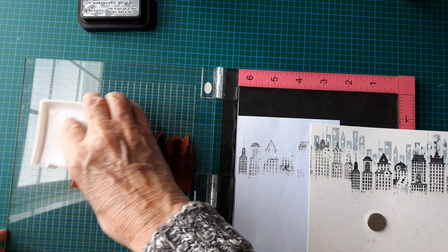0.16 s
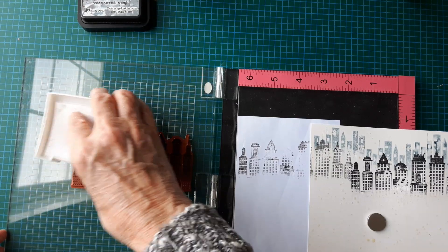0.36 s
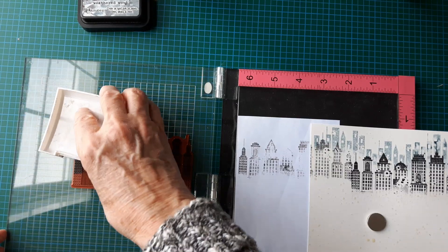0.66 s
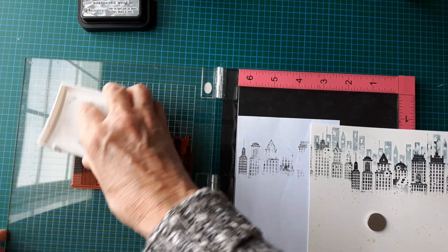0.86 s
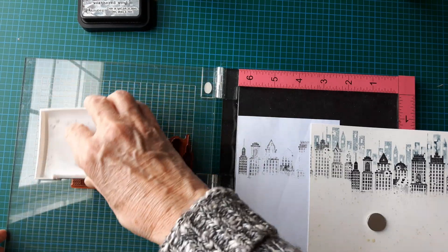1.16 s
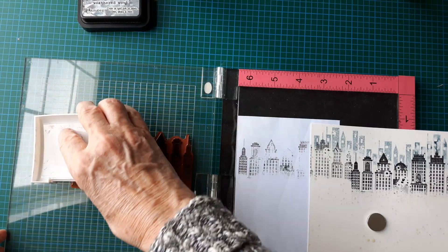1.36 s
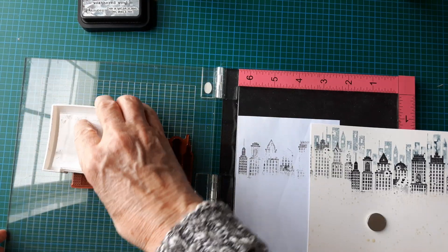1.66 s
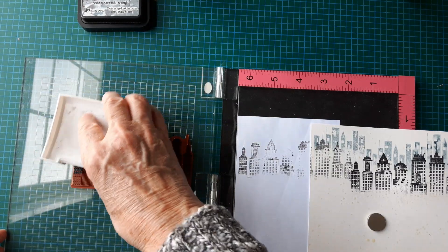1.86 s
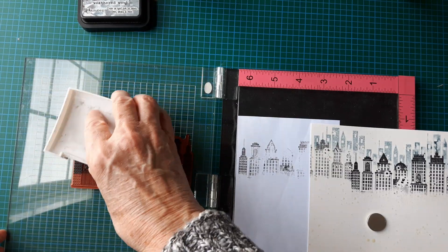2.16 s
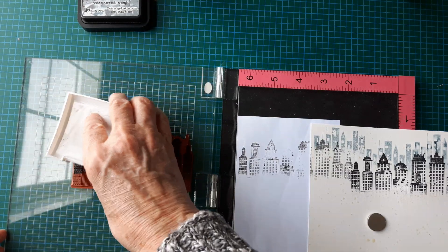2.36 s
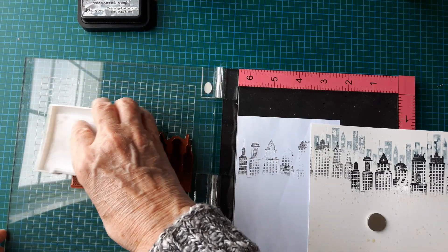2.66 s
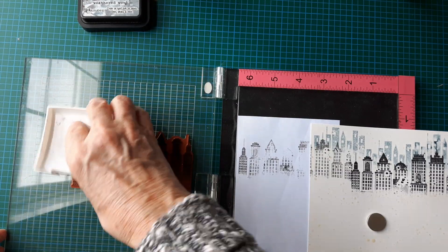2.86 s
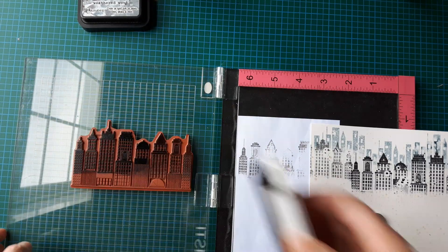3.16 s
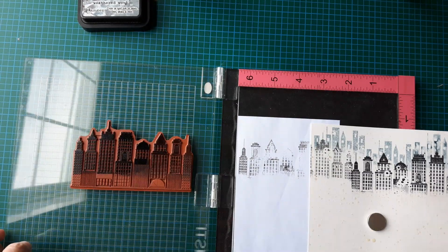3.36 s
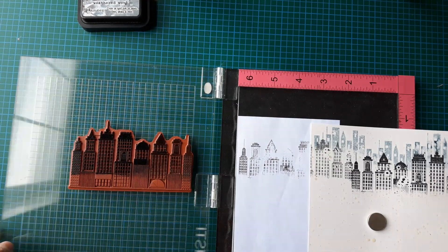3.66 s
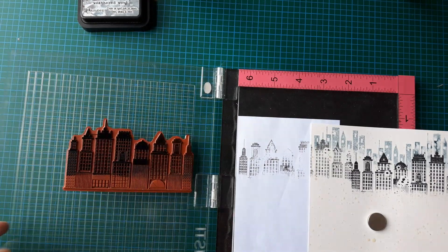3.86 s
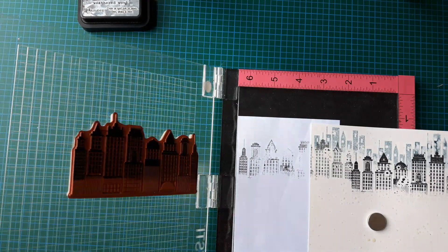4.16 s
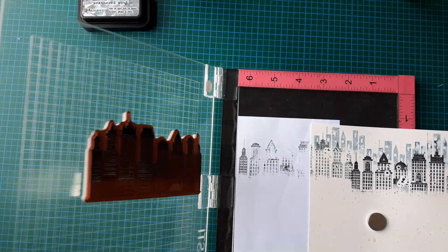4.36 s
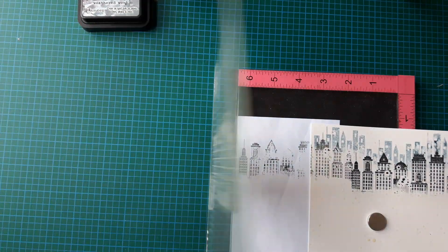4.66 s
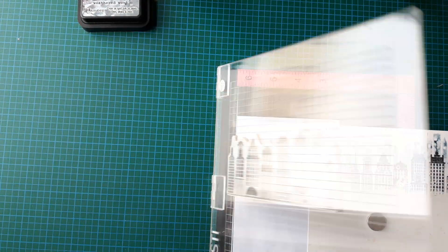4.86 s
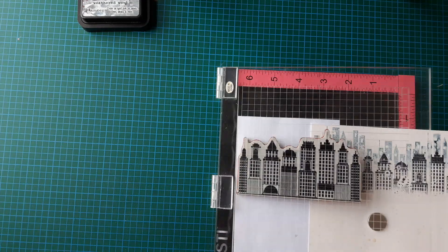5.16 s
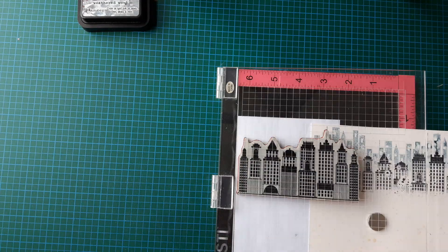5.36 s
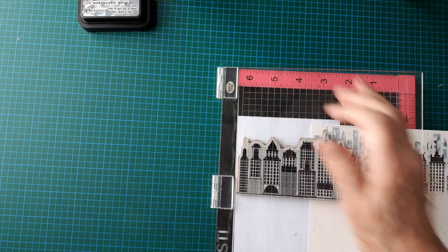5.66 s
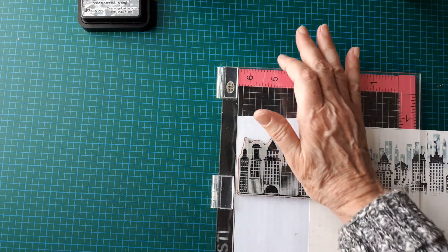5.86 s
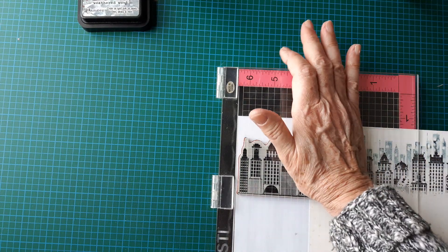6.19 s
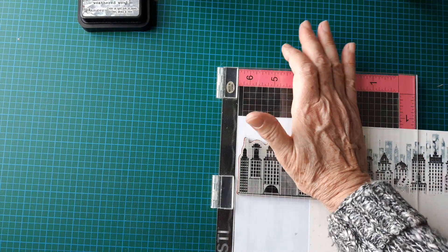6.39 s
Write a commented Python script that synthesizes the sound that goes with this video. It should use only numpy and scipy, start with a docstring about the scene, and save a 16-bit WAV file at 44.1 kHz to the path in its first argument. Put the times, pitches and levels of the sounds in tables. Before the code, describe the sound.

Close up in a quiet room, a hard plastic ink pad dabs a rubber stamp on an acrylic plate: rapid irregular clicks with low thumps, growing denser and heavier. After three seconds come soft handling bumps and hinge knocks, then one loud, bouncing clack as the plate shuts. Only faint rubbing, sleeve rustle and a tiny rapid tick remain.

```python
"""A plastic ink pad dabs a rubber stamp on an acrylic plate; the plate is lifted and a lid clacks shut.
Case, plate, desk and lid are banks of decaying modes set ringing by blows; ink snaps are noise bursts.
Handling is dense random contacts into the same modes, a sleeve swishes as swelling noise, faint tones glide.
Close to the microphone a small mechanism ticks about ten times a second; behind it lies quiet room noise."""
import sys
import numpy as np
from scipy import signal
from scipy.fft import rfft, irfft, next_fast_len
from scipy.io import wavfile

SR = 44100
rng = np.random.default_rng(int(sys.argv[2]) if len(sys.argv) > 2 else 0)


def transcribe(signal):
    """Save signal, clipped to [-1, 1], as a 16-bit WAV file at the path in sys.argv[1]."""
    frames = np.atleast_2d(signal).T
    limited = np.clip(frames, -1, 1)
    pcm = np.round(limited * 32767).astype(np.int16)
    wavfile.write(sys.argv[1], SR, pcm)


N = 287953  # length in samples

# pad case clicks that stand out: t/s, case level/dB, rattle level/dB, ink snap level/dB
CLICKS = [(.0432, -45, -67, -82), (.0825, -36, -62, -79), (0.2834, -33, -58, -72), (0.3292, -43, -59, -75),
          (0.3775, -35, -58, -76), (0.4795, -31.5, -55, -72), (.572, -35, -59, -75),
          (0.6231, -30, -65, -74), (.671, -30.5, -57, -75), (.681, -33, -76, -80), (0.71, -41, -73, -84),
          (0.7692, -31, -58.5, -71), (.7872, -32.5, -82, -77), (0.8402, -33, -56, -77),
          (0.9336, -44, -80, -81), (0.9413, -35.5, -76, -84), (0.9492, -42.5, -77, -80),
          (1.4313, -36.5, -66, -75), (1.4408, -41.5, -72, -86), (1.479, -44.5, -76, -82),
          (1.576, -38, -57, -67.5), (1.7126, -44.5, -67, -59), (1.735, -35.5, -53, -92),
          (1.7617, -40, -58, -77), (1.7659, -41, -50, -69), (1.7759, -42, -47.5, -63),
          (1.8435, -42.5, -66, -73), (1.8997, -39.5, -54.5, -71), (1.9182, -45, -54.5, -66),
          (2.0383, -29, -53, -68), (2.045, -50, -56, -75), (2.0488, -60, -51, -77), (2.0693, -36, -61, -62),
          (2.0761, -36, -44, -59), (2.0892, -51, -48, -64), (2.1026, -47, -50, -77), (2.129, -44, -75, -77),
          (2.19, -33, -54, -71), (2.2099, -35.5, -57, -75), (2.219, -40, -70, -77),
          (2.3012, -44.5, -63, -78), (2.3215, -31, -51, -70), (2.3424, -36.5, -53, -64),
          (2.351, -41, -48.5, -59), (2.3656, -42, -68, -88), (2.419, -39, -51, -66), (2.432, -38, -68, -74),
          (2.437, -42, -48, -56.5), (2.466, -48, -73, -81), (2.5569, -40.5, -58, -60.5),
          (2.5775, -35.5, -64, -78), (2.5993, -39, -55, -74), (2.6055, -38.5, -48.5, -62),
          (2.6227, -38, -71, -82), (2.7173, -37, -45, -54.5), (2.7217, -39, -58, -78),
          (2.8032, -36.5, -65, -61), (2.8079, -30, -55, -64), (2.813, -42, -48, -81),
          (2.8308, -44, -76, -83), (2.8583, -40.5, -66, -65), (2.8756, -40, -62, -83),
          (2.8917, -47, -69, -81), (2.9261, -30.5, -44, -53), (2.9696, -50.5, -76, -78)]
# pad or hand pushing the plate: t/s, thump level/dB, knock level/dB, desk level/dB
THUDS = [(.086, -57, -49, -52), (0.287, -42, -48, -44.5), (.316, -56, -51.5, -66), (.381, -65, -50.5, -72),
         (.482, -39.5, -53, -41.5), (0.672, -57.5, -45.5, -50), (.788, -62, -51, -75), (.95, -62, -53, -75),
         (1.443, -46, -47, -49), (1.598, -76, -47, -77), (1.712, -31, -38, -46), (1.823, -74, -46, -84),
         (1.847, -62, -37.5, -59), (1.907, -55, -53, -78), (2.0407, -32.5, -36.5, -41),
         (2.128, -66, -45.5, -61), (2.172, -60, -46.5, -58), (2.206, -74, -54, -67),
         (2.318, -54, -52.5, -46), (2.344, -52, -49.5, -73), (2.442, -55, -49, -59),
         (2.59, -54, -48.5, -53), (2.63, -65, -45.5, -49), (2.656, -74, -57, -58), (2.725, -55, -48, -65),
         (2.758, -59, -67, -55), (2.8088, -31.5, -37.5, -41), (2.899, -66, -45, -60), (2.93, -60, -55, -46),
         (3.216, -49, -52.5, -52), (3.289, -48, -85, -53), (3.402, -44.5, -66, -74), (3.445, -54, -62, -59),
         (3.6, -53, -72, -65), (3.8, -63, -61.5, -68), (3.939, -50, -70, -67), (4.096, -60, -42.5, -61),
         (4.156, -52, -50, -69), (4.179, -52, -76, -61), (4.245, -69, -44, -70), (4.266, -42.5, -52, -72),
         (4.383, -42.5, -49, -69), (5.118, -57, -64, -79), (5.299, -58, -56, -81.5), (5.476, -66, -63, -78),
         (5.613, -77, -57.5, -78.5), (5.678, -52.5, -62, -80), (5.878, -61, -67, -71)]
# plate knocked and lifted at its hinge: t/s, knock level/dB, rattle level/dB, snap level/dB
KNOCKS = [(3.2, -62, -67, -72), (3.3424, -45, -69, -64.5), (4.1021, -45, -56.5, -65.5),
          (4.2673, -54.5, -49.5, -89), (4.272, -56, -52.5, -97.5), (4.2817, -53, -65, -60),
          (4.2928, -58, -57.5, -68), (4.4178, -53, -68, -71)]
# modes of the pad case: f/Hz, level/dB, t60/s
CASE = [(1040, -13, 0.0094), (1380, -12.5, 0.0039), (1408, 4, 0.0098), (1533, 3, 0.014),
        (1995, -2.5, 0.0045), (2000, -11.5, 0.0045), (2526, -15.5, 0.018), (3460, -39, 0.0032)]
# modes of the hinge: f/Hz, level/dB, t60/s
HINGE = [(1034, -1.5, 0.016), (1722, 4, 0.012), (2930, -2.5, 0.0053)]
# modes of the free plate, four low ones that thump, then those that knock: f/Hz, level/dB, t60/s
PLATE = [(131.5, -8, 0.13), (160.6, -4.5, 0.17), (229.4, 0, 0.14), (290, 3.5, 0.034), (343.8, -1, 0.096),
         (420.4, -5, 0.19), (526.5, 1.5, 0.081), (725, -8.5, 0.0429), (887, -10.5, .03)]
LOW_MODES = 4
# noise colour of cracks and snaps: f/Hz, level/dB per Hz
CRACK = [(1500, -4), (2500, -0.5), (3400, -0.5), (5500, -8), (7500, -12), (10500, -7.5), (12000, -3),
         (13200, 1), (15500, -8), (16500, -31)]


def dabbing():
    """Case and hinge click; each push excites the plate's low and high modes and the desk beneath."""
    # modes of the desk: f/Hz, level/dB, t60/s
    desk_modes = [(60.4, -7, 0.42), (94.2, -4.5, 0.65)]
    s, thump_db, knock_db, desk_db = np.transpose(THUDS)
    thump = strike(s, thump_db, PLATE[:LOW_MODES], soft_s=0.0037)
    knock = strike(s, knock_db, PLATE[LOW_MODES:], soft_s=0.0014)
    desk = strike(s, desk_db, desk_modes, soft_s=0.012)
    return case_clicks() + contacts(KNOCKS, HINGE) + thump + knock + desk


def case_clicks():
    """Each case click that stands out is trailed by two weak ones at random short delays."""
    delay_min_s, delay_max_s = .005, .025
    loss_db, spread_db = 21, 5
    rows = np.array(CLICKS)
    all_rows = [rows]
    for _ in range(2):
        delay_s = rng.uniform(delay_min_s, delay_max_s, len(rows))
        change_db = rng.uniform(-spread_db, spread_db, len(rows)) - loss_db
        all_rows.append(rows + np.c_[delay_s, np.outer(change_db, [1, 1, 1])])
    return contacts(np.vstack(all_rows), CASE)


def contacts(rows, body):
    """A body rings, its loose parts rattle, the surfaces part with a snap."""
    # modes of the loose parts: f/Hz, level/dB, t60/s
    rattle_modes = [(2950, 0, 0.0065), (3535, -8, 0.014), (4027, -8, 0.028), (4570, -7, 0.021),
                    (6260, -5.5, 0.0033)]
    s, body_db, rattle_db, snap_db = np.transpose(rows)
    knock = strike(s, body_db, body, soft_s=0.00022)
    rattle = strike(s, rattle_db, rattle_modes, soft_s=.00005)
    return knock + rattle + bursts(s, snap_db, CRACK, t60=0.044)


def lid():
    """Hard landings ring the lid's modes, each with a bright crack and a rough shudder after it."""
    # landing and bouncing: t/s, body level/dB, crack level/dB, shudder level/dB
    clacks = [(4.6828, -25.5, -36.5, -45), (4.6844, -22.5, -40.5, -25), (4.7178, -27.5, -37, -33),
              (4.7405, -41, -49, -42)]
    # modes of the free lid: f/Hz, level/dB, t60/s
    lid_modes = [(143.4, -27.5, 0.64), (220, -2.5, 0.17), (302, -15, 0.17), (410, -1.5, 0.078),
                 (500, -6.5, 0.12), (594, 1.5, 0.019), (755, -7, 0.039), (856, -5, 0.015),
                 (1016, -2, 0.017), (1120, -4.5, 0.076), (1396, -7.5, 0.014), (1586, -9.5, 0.046),
                 (1900, -0.5, 0.0033), (2168, -10, 0.099), (3120, -32.5, 0.029), (6270, -27, 0.087)]
    # air squeezed out as the faces meet: t/s
    slap_s = [4.6845]
    # the same air, as one broad pulse: f/Hz, level/dB, t60/s
    slap_mode = [(680, 0, .005)]
    slap_db = 2.5
    shudder_rise_s, shudder_t60_s = 0.0017, 0.17
    settle_db, settle_t60_s = -51, 0.65
    graze_s, graze_db, graze_rise_s = 4.635, -57, .015
    s, body_db, crack_db, shudder_db = np.transpose(clacks)

    blows = strike(s, body_db, lid_modes, soft_s=0.00015)
    blows = blows + strike(slap_s, slap_db, slap_mode, soft_s=0.00067)
    # too small to radiate deep bass
    blows = signal.lfilter(*signal.butter(1, 110, "high", fs=SR), blows)

    shudder = swell(s, shudder_db, shudder_rise_s, shudder_t60_s)
    # after the last bounce it settles more slowly
    settling = swell(s[-1:], settle_db, shudder_rise_s, settle_t60_s)
    before_landing = np.arange(N) < s[0] * SR
    graze = swell([graze_s], graze_db, graze_rise_s, t60=0.94) * before_landing
    # contact damps the long rings; the tilt is in dB per octave about 500 Hz
    pressed = [(hz, db + 0.97 * np.log2(hz / 500), min(t60, .035)) for hz, db, t60 in lid_modes]
    rough = grains(1500, pressed, uneven_db=3.0, from_s=graze_s)
    return blows + (shudder + settling + graze) * rough + bursts(s, crack_db, CRACK, t60=0.13)


def handling():
    """Moving hands keep the plate's low modes murmuring, scuff its higher ones and make the case chatter."""
    # hands between the pushes: t/s, low rumble level/dB, scuff level/dB, case or hinge chatter level/dB
    hands = [(0, -75, -61.5, -89), (.25, -73, -93, -85), (.6, -73, -60.5, -91), (.85, -69.5, -75, -98),
             (1.13, -76, -76, -77), (1.4, -83, -81, -88), (2.3, -68.5, -77, -70), (2.7, -64, -78, -83),
             (3.06, -61.5, -72, -70.5), (3.45, -66.5, -76, -82.5), (4.05, -64, -84, -100),
             (4.15, -58, -77, -73), (4.27, -75, -57, -69.5), (4.5, -69.5, -71.5, -76.5),
             (4.66, -63, -64, -71.5), (5.1, -78, -76.5, -76.5), (5.45, -75.5, -88, -85),
             (5.9, -74.5, -80, -104), (6.4, -87.5, -99.5, -102), (6.53, -76.5, -76, -95)]
    # rub left by a thump: level against the blow/dB, rise/s, t60/s
    rumble_rub = (-8.5, 0.016, 0.14)
    # rub left by a knock: level against the blow/dB, rise/s, t60/s
    scuff_rub = (-10, 0.011, 0.22)
    # rub left by a case click or hinge knock: level against the blow/dB, rise/s, t60/s
    chatter_rub = (-27.5, 0.0034, 0.18)
    pad_down_s = 3.25
    low, scuff, chatter = along(hands)
    s, thump_db, knock_db, _ = np.transpose(THUDS)
    low = low + after(s, thump_db, rumble_rub)
    scuff = scuff + after(s, knock_db, scuff_rub)
    s, case_db, *_ = np.transpose(CLICKS + KNOCKS)
    chatter = chatter + after(s, case_db, chatter_rub)

    damped = [(hz, db, t60 * 0.46) for hz, db, t60 in PLATE]  # fingers damp the plate
    murmur = low * grains(300, damped[:LOW_MODES], uneven_db=2.0)
    scrape = scuff * grains(600, damped[LOW_MODES:], uneven_db=2.5)
    case_rub = grains(230, CASE, uneven_db=1.0)
    hinge_rub = grains(2100, HINGE, uneven_db=2.0, from_s=pad_down_s)
    pad_in_hand = np.arange(N) < pad_down_s * SR  # afterwards only the hinge rubs
    return murmur + scrape + chatter * np.where(pad_in_hand, case_rub, hinge_rub)


def after(times, db, rub):
    """The rub that follows a set of blows, as a gain."""
    against_blow_db, rise_s, t60 = rub
    return swell(times, db + against_blow_db, rise_s, t60)


def sleeve():
    """Wool brushing past: bright noise, each pass a soft swell."""
    # noise colour of the wool: f/Hz, level/dB per Hz
    wool_colour = [(8000, -28.5), (10500, -19), (11700, -5.5), (13400, 0), (15100, -10), (16000, -32)]
    # passes: middle t/s, half length/s, level/dB
    passes = [(2.404, 1, -92), (2.95, .05, -87), (3.6, 0.74, -95), (4.296, 0.088, -78.5),
              (4.704, 0.75, -85), (5.697, 0.077, -77)]
    t = np.arange(N) / SR
    gain = sum(amp(db) * np.exp(-((t - s) / half) ** 2) for s, half, db in passes)
    return coloured(wool_colour) * gain


def tones():
    """Faint wavering tones: short soft-edged sine glides."""
    # glides: t/s, length/s, start f/Hz, end f/Hz, level before the roughness/dB
    glides = [(4.977, .12, 2410, 2550, -67.5), (5.1, .11, 840, 897, -69), (5.226, 0.043, 1810, 1800, -76.5),
              (5.338, .18, 238.6, 234.3, -61), (5.657, 0.2, 335, 330, -62)]
    t, out = np.arange(N) / SR, 0
    for s, length, start_hz, end_hz, db in glides:
        part = np.clip((t - s) / length, 0, 1)
        phase = 2 * np.pi * np.cumsum(start_hz + (end_hz - start_hz) * part) / SR
        edges = np.sqrt(np.sin(np.pi * part).clip(0))
        out = out + amp(db) * edges * np.sin(phase)
    return out * amp(3.5 * drift(71))  # rough, as a rubbing joint is


def ticks():
    """A steady tick that sometimes skips or strays, too near the microphone to stir the room."""
    # ticks between the steady ones: t/s, level/dB
    stray = [(.3282, -63), (.818, -54), (.8936, -58), (1.1075, -57.5), (2.3872, -49), (2.392, -54),
             (3.6677, -55), (3.835, -54.5), (4.0098, -57), (4.9452, -47), (6.2276, -54.5)]
    # places in the steady row that stay silent: index
    skipped = [7, 8, 9, 23, 37, 39, 40, 48]
    # modes of the mechanism: f/Hz, level/dB, t60/s
    tick_modes = [(4330, -5, 0.0077), (5850, -9.5, 0.0063), (7940, -10.5, 0.003)]
    start_s, period_s, steady_db = .0514, .1024, -55
    steady = np.delete(np.arange(start_s, N / SR, period_s), skipped)
    s, db = np.transpose([(s, steady_db) for s in steady] + stray)
    return strike(s, db, tick_modes, soft_s=.00003)


def room(x):
    """Diffuse tail: octave bands of noise, each dying at its own rate, building over the first ms."""
    # decay of the room: f/Hz, t60/s
    room_t60 = [(60, 0.53), (250, 0.23), (1000, 0.43), (3000, 0.54), (8000, 0.35), (14000, 0.082)]
    t, tail = np.arange(SR) / SR, 0
    for low_hz in 40 * 2 ** np.arange(0, 8.6):
        edges_hz = [low_hz, min(2 * low_hz, .45 * SR)]
        sos = signal.butter(2, edges_hz, "band", fs=SR, output="sos")
        band = signal.sosfilt(sos, rng.standard_normal(SR))
        tail = tail + band * amp(-60 * t / at_hz(room_t60, 0.85 * low_hz))
    tail = tail * (1 - np.exp(-t / 0.00067))
    return signal.fftconvolve(x, tail / np.sqrt(np.sum(tail ** 2)))[:N]


def room_air():
    """The quiet room: steady noise, strongest in the bass."""
    # noise colour of the room: f/Hz, level/dB per Hz
    air_colour = [(15, -46), (25, -2), (35, -4.5), (49, -16), (84, -5), (130, -1), (189, -11.5), (324, -6),
                  (3050, -29.5), (4330, -32), (5090, -34.5), (8970, -40), (13800, -40), (15800, -40.5)]
    return amp(-65.5) * coloured(air_colour)


def side_hiss():
    """Faint noise that enters the two channels with opposite sign."""
    # noise colour of the hiss: f/Hz, level/dB per Hz
    hiss_colour = [(18, -47), (30, -13.5), (124, -6.5), (392, -3), (1450, -9), (3190, -16.5), (13900, -29),
                   (15800, -17)]
    return amp(-81.0) * coloured(hiss_colour)


def strike(times, db, modes, soft_s):
    """Each blow drives every mode with a slightly different strength; a soft contact lasts longer, duller."""
    spread_db = 1.5
    at, out = np.round(np.asarray(times) * SR).astype(int), np.zeros(N)
    first = at.min()
    chance = rng.standard_normal((len(at), len(modes)))
    for k, (hz, level_db, t60) in enumerate(modes):
        push = np.zeros(N)
        push[at] = amp(db + level_db + spread_db * chance[:, k]) * (-1) ** k
        out[first:] += ring(push[first:], hz, t60)
    # half-sine pulse of contact force
    contact = np.sin(np.pi * np.clip(np.arange(1, 900) / (soft_s * SR + 2), 0, 1))
    return signal.oaconvolve(out, contact / contact.sum())[:N]


def ring(push, hz, t60):
    """A two-pole resonator: a unit click sets a decaying sine ringing from height 1."""
    r, w = amp(-60 / (max(t60, .001) * SR)), 2 * np.pi * hz / SR
    return signal.lfilter([0, np.sin(w)], [1, -2 * r * np.cos(w), r * r], push + 1e-18)


def grains(rate, modes, uneven_db, from_s=0):
    """Dense random contacts (rate per second) of uneven size ring the modes from from_s on, there at rms 1."""
    first = int(from_s * SR)
    hits = rng.random(N) < rate / SR
    size = amp(uneven_db * np.minimum(rng.exponential(1, N), 4))
    push = hits * size * rng.choice([-1, 1], N)
    rings = sum(amp(db) * ring(push[first:], hz, t60) * (-1) ** k for k, (hz, db, t60) in enumerate(modes))
    return np.r_[np.zeros(first), rms_one(rings)]


def impulses(times, db):
    """One sample of the given level at each time."""
    push = np.zeros(N)
    push[np.round(np.asarray(times) * SR).astype(int)] = amp(db)
    return push + 1e-18


def bursts(times, db, spectrum, t60):
    """Noise that starts at each time and dies away."""
    decay = amp(-60 / (t60 * SR))
    return coloured(spectrum) * signal.lfilter([1], [1, -decay], impulses(times, db))


def swell(times, db, rise_s, t60):
    """A gain that rises at each time and dies away."""
    lag, decay = np.exp(-1 / (rise_s * SR)), amp(-60 / (t60 * SR))
    return signal.lfilter([1 - lag], np.convolve([1, -lag], [1, -decay]), impulses(times, db))


def along(rows):
    """Columns of a table, joined in time, as gains."""
    s, *columns = np.transpose(rows)
    return [amp(np.interp(np.arange(N) / SR, s, c)) for c in columns]


def coloured(spectrum):
    """Noise with the given spectrum, rms 1."""
    size = next_fast_len(N)
    hz = np.fft.rfftfreq(size, 1 / SR)
    shaped = rfft(rng.standard_normal(size)) * amp(at_hz(spectrum, hz))
    return rms_one(irfft(shaped, size)[:N])


def drift(rate):
    """Random wander below the given rate in Hz, rms 1."""
    sos = signal.butter(2, rate, fs=SR, output="sos")
    return rms_one(signal.sosfilt(sos, rng.standard_normal(N + SR))[SR:])  # filter start-up dropped


def at_hz(points, hz):
    """Read a table on a log-frequency axis."""
    table_hz, values = np.transpose(points)
    return np.interp(np.log(np.maximum(hz, 1)), np.log(table_hz), values)


def rms_one(x):
    """Scale to rms 1."""
    return x / np.sqrt(np.mean(x ** 2) + 1e-20)


def amp(db):
    """dB to gain."""
    return 10 ** (np.asarray(db) / 20)


def scene():
    """The channels are nearly one; only a faint hiss differs between them."""
    pad, shut = dabbing(), lid()
    wet = room(amp(-8.5) * pad + amp(-7.0) * shut)
    mid = pad + shut + wet + handling() + sleeve() + tones() + ticks() + room_air()
    side = side_hiss()
    return np.array([mid + side, mid - side])


def record(dry):
    """The microphone drops the deep bass; the top is cut; a small steady offset is added."""
    cutoff_hz, offset = 16866, -.0005
    thin = signal.sosfilt(signal.butter(4, 50, "high", fs=SR, output="sos"), dry)
    return signal.sosfilt(signal.cheby2(14, 60, cutoff_hz, fs=SR, output="sos"), thin) + offset


dry = scene()
out = record(dry)
transcribe(out)
```